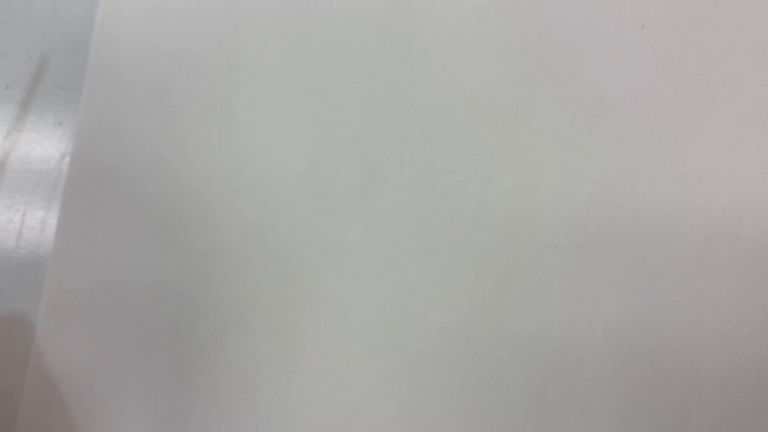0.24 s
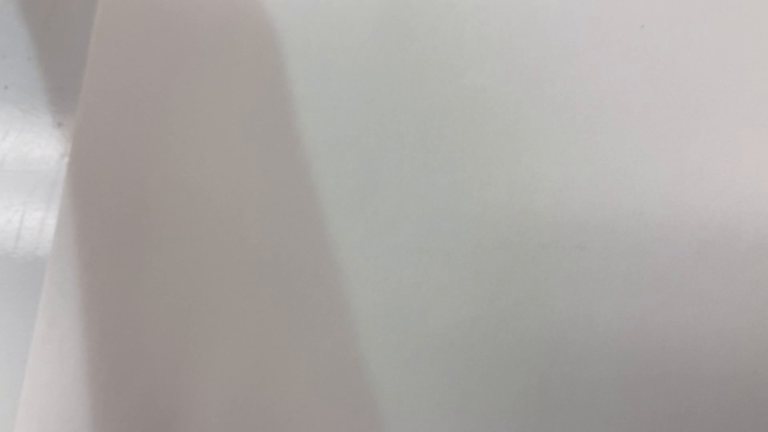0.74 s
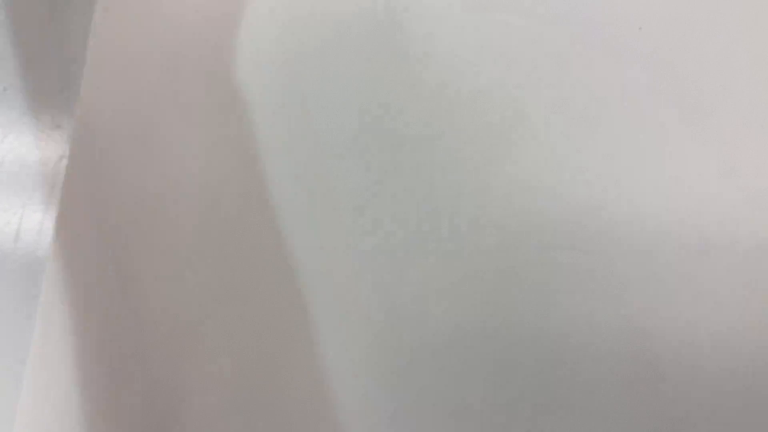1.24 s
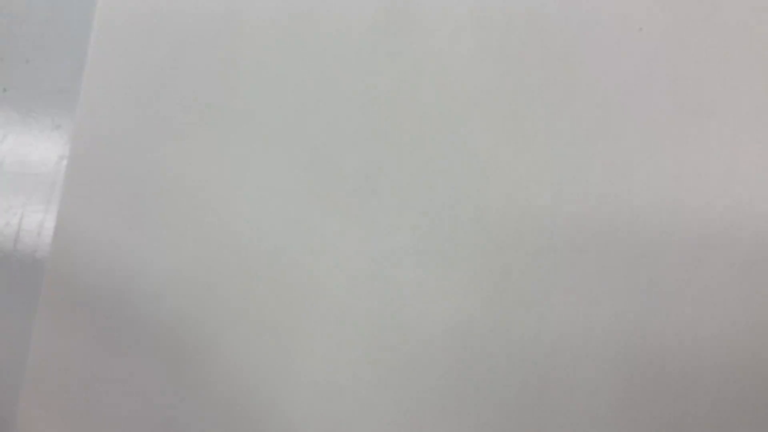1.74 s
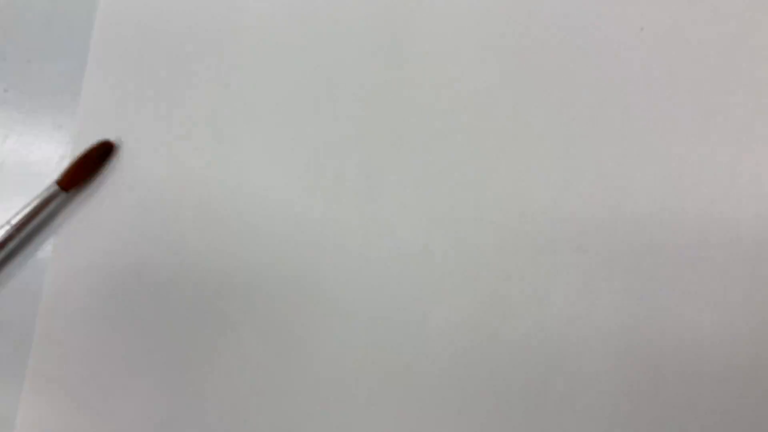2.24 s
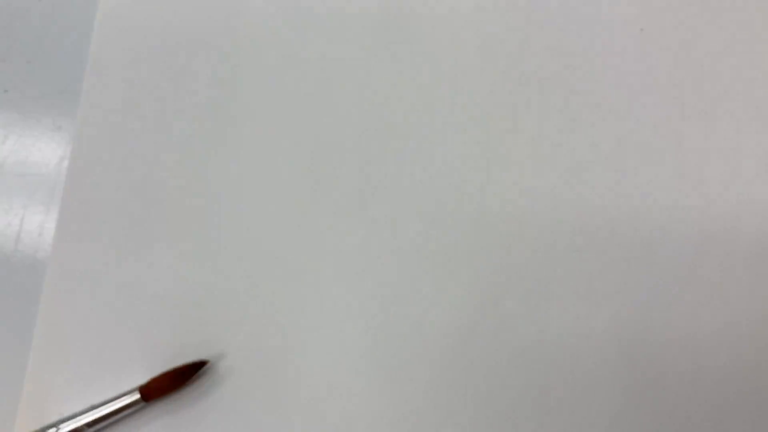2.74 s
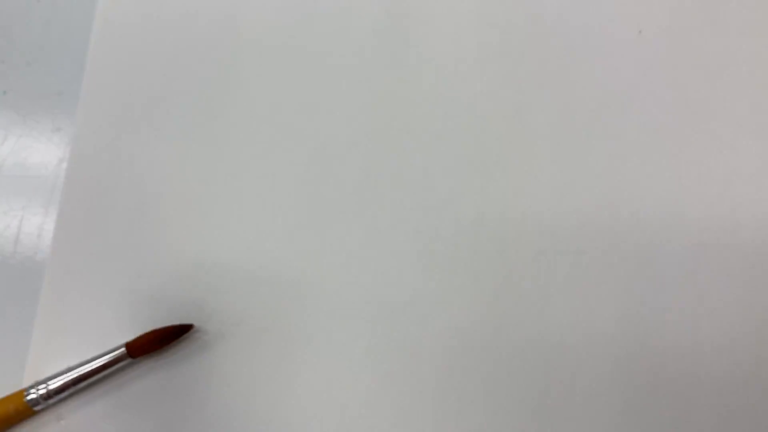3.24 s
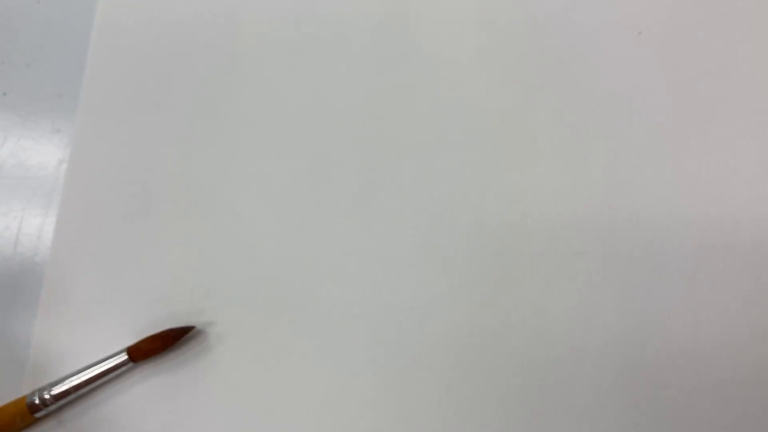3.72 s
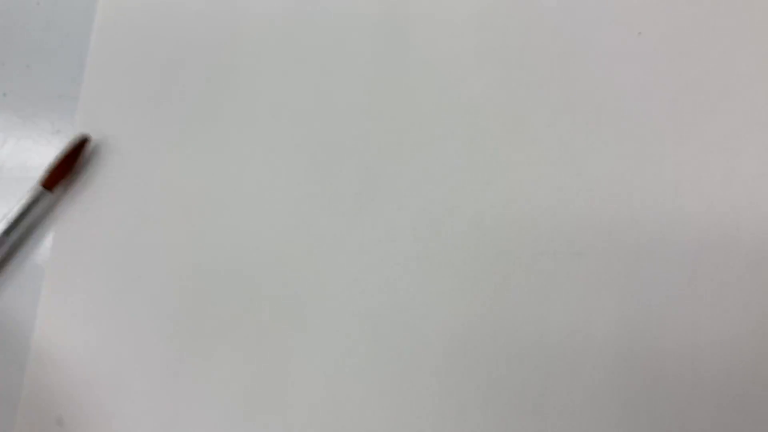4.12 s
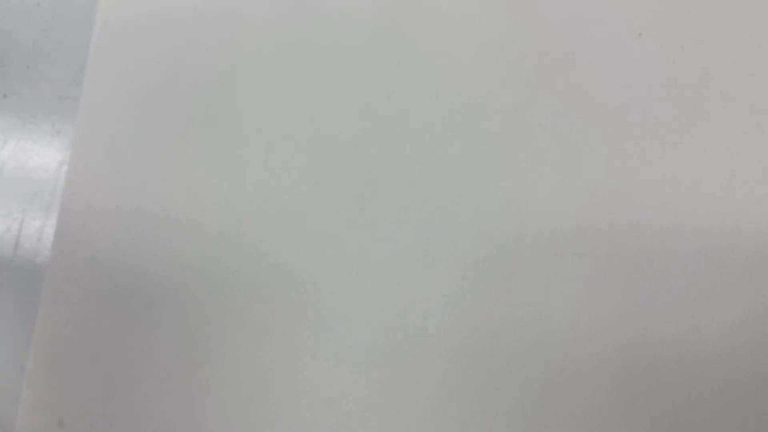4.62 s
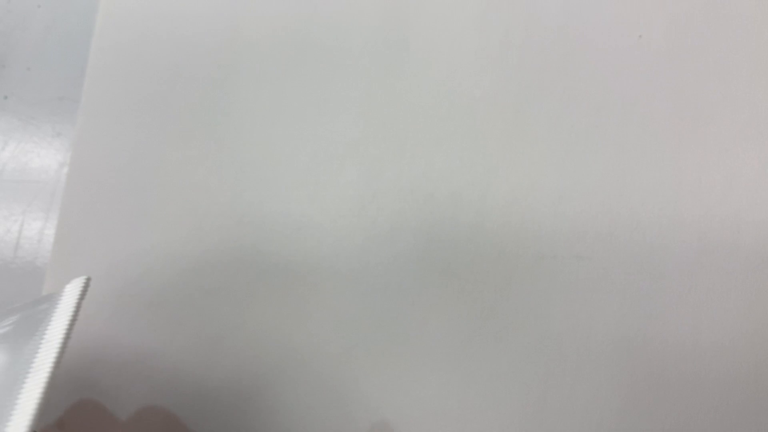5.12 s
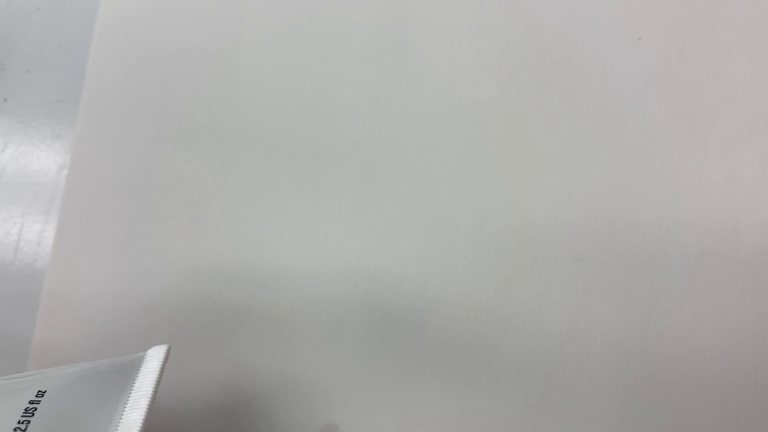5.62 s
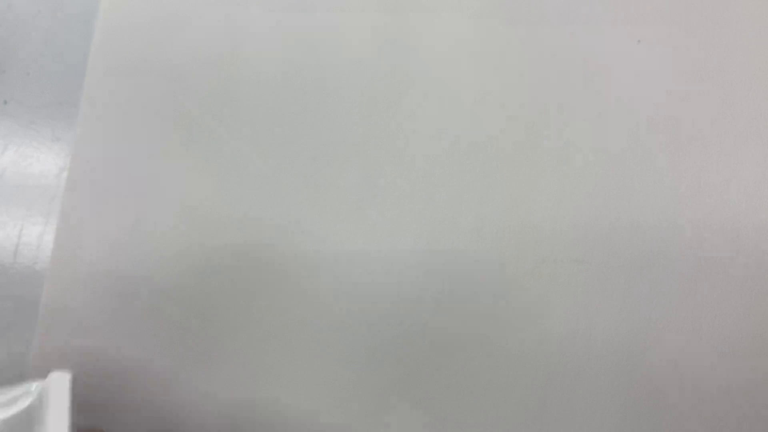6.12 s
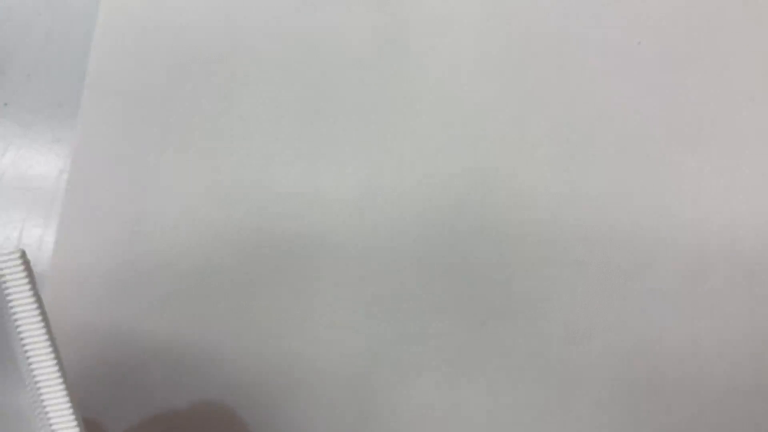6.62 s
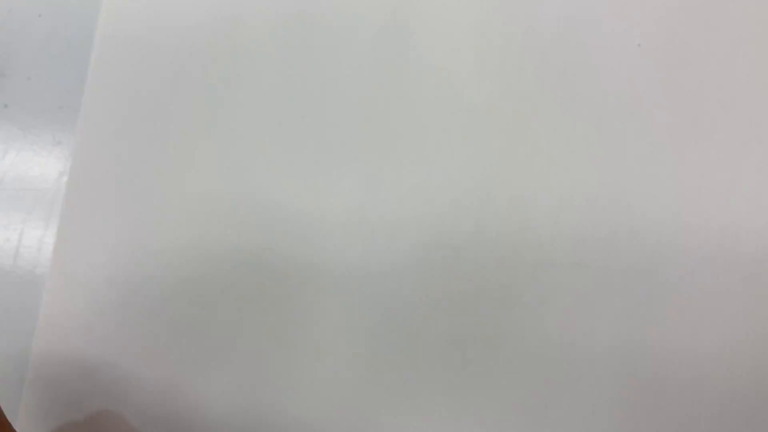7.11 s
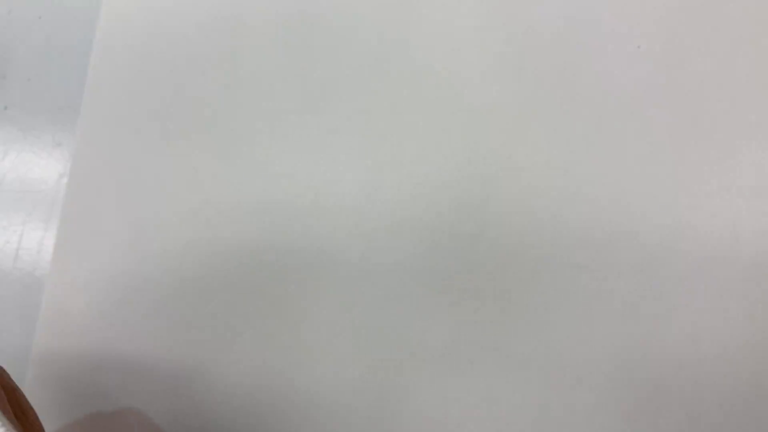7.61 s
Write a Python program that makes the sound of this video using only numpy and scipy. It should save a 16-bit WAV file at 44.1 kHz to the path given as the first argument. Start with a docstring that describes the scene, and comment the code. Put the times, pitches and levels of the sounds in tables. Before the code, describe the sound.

Close by in a small quiet room, hands slide paper over a table with soft rustles, scrapes and ticks. Several low thumps make the tabletop ring, and a paintbrush lands with a crisp click, the sharpest sound. More paper scraping and a hollow plastic knock come next, then a few tiny crackles from a plastic tube. The handling dies away, leaving faint hum and hiss.

```python
"""Paper, paintbrush and plastic tube on a table.

A sheet of paper is smoothed and pushed about close by in a small quiet room; its fibres catch and slip,
and the table drones under it. Hands bump the table and set it ringing. A paintbrush is put down with a
sharp click, hollow plastic knocks, and a plastic tube is picked up and crinkles as its wall buckles.
A faint low hum and hiss lie under it all."""
import sys
import numpy as np
from scipy import signal
from scipy.fft import rfft, irfft, next_fast_len
from scipy.io import wavfile
from scipy.ndimage import uniform_filter1d, map_coordinates

SR = 44100
rng = np.random.default_rng(int(sys.argv[2]) if len(sys.argv) > 2 else 0)


def inscribe(sig):
    """Save sig as 16-bit PCM at rate SR to the path in sys.argv[1].

    A 1-D sig is mono; a 2-D sig holds one channel per row.
    Samples are clipped to [-1, 1] before scaling.
    """
    pcm = np.round(np.clip(np.atleast_2d(sig).T, -1, 1) * 32767)
    wavfile.write(sys.argv[1], SR, pcm.astype(np.int16))


N = 346626


def amp(db):
    """Decibels to gain."""
    return 10 ** (np.asarray(db) / 20)


def unit(x):
    """x at rms 1."""
    return x / np.sqrt(np.mean(x ** 2) + 1e-20)


def along(points, hz):
    """(freq_hz, value) points read on a log axis."""
    freqs, values = np.transpose(points)
    return np.interp(np.log(hz + 1), np.log(freqs), values)


def filtered(x, response):
    """x times a complex frequency response."""
    n = x.shape[-1]
    size = next_fast_len(n + 4096)
    return irfft(rfft(x, size) * response(np.fft.rfftfreq(size, 1 / SR)), size)[..., :n]


def coloured(x, spectrum):
    """x shaped by a spectrum, at rms 1."""
    return unit(filtered(x, lambda hz: amp(along(spectrum, hz))))


def resonant(x, peaks):
    """x through parallel resonances, at rms 1."""
    return unit(filtered(x, lambda f: sum(
        amp(db) * 1j * f * width / (hz * hz - f * f + 1j * f * width) for hz, width, db in peaks)))


def noise(size):
    """Two independent white noises."""
    return rng.standard_normal((2, size))


def wobble(rate_hz):
    """Smooth random curve, rate_hz knots a second."""
    knots = rng.standard_normal(int(N * rate_hz / SR) + 4)
    return map_coordinates(knots, [np.arange(N) * rate_hz / SR])


def add(track, start_s, sound):
    """Mix a sound in at start_s, which may be negative."""
    start = round(start_s * SR)
    sound = sound[:, max(-start, 0):]
    part = track[:, max(start, 0):][:, :sound.shape[1]]
    part += sound[:, :part.shape[1]]


def burst(spectrum, t60_s, attack_s):
    """A contact's dense ring: decaying coloured noise."""
    t = np.arange(SR // 3) / SR
    return coloured(noise(len(t)), spectrum) * amp(-60 * t / t60_s) * (1 - np.exp(-t / attack_s))


def ring(modes, attack_s, scatter_db):
    """Damped modes, their strengths scattered per blow."""
    t = np.arange(SR // 2) / SR
    phases = [[0], [np.pi / 2]]
    tones = 0
    for hz, db, t60_s in modes:
        struck_db = db - scatter_db * rng.standard_normal((2, 1))
        tones += amp(struck_db - 60 * t / t60_s) * np.sin(2 * np.pi * hz * t + phases)
    return tones * (1 - np.exp(-t / attack_s))


def friction(grain_db, rate_hz):
    """Fibres catch and slip: noise in tiny uneven clumps."""
    return noise(N) * amp(grain_db * wobble(rate_hz))


def stroke_gain(length_s, attack_s=0.018, swell_db=1.5, fade_db_per_s=399.5):
    """The hand gets going, is fastest midway, then stops."""
    t = np.arange(SR) / SR
    attack = np.sin(np.pi / 2 * np.minimum(t / attack_s, 1)) ** 2
    arch = np.sin(np.pi * np.minimum(t / length_s, 1)) - .5
    return attack * amp(swell_db * arch - fade_db_per_s * np.maximum(t - length_s, 0))


# rubbed table and sheet resonances: centre_hz, width_hz, level_db
DRONE_PEAKS = [(235, 25, 4.5), (290, 100, -4), (381, 40, -1.5), (624, 150, -14), (1180, 49, -16),
               (1650, 35, -14), (1955, 45, -17), (2130, 30, -19.5)]
SHEET_PEAKS = [(1159, 77, 1.5), (1590, 40, -9), (1900, 170, -9.5), (3010, 600, -10.5), (3450, 600, -13.5)]
# paper friction spectra: freq_hz, level_db
RUB_SPECTRUM = [(350, -22), (600, 3.5), (1000, -3.5), (2000, -1.5), (3500, -4.5), (5000, -11.5),
                (7000, -14.5), (10000, -35.5)]
HISS_SPECTRUM = [(3000, -34.5), (6000, -3.5), (8000, 0), (11500, -0.5), (13000, -6.5), (15000, -7),
                 (16000, -7.5)]
# resting hand's stir: time_s, rub_db
FIDGET_LEVELS = [(0, -93), (1.7, -77), (3.2, -84), (4.799, -90), (5.9, -90), (6.399, -95)]
# hand strokes: start_s, length_s, rub_db, drone_offset_db, hiss_offset_db
HAND_STROKES = [(-.02, 0.15, -58, 11.5, 0), (.23, 0.072, -70, 12.5, -6), (.335, 0.059, -60, -1, -4),
                (1.29, .12, -69.5, 3, -9), (1.39, .13, -60.5, 1, -12), (1.855, 0.21, -62.5, 3, -2.5),
                (1.974, 0.059, -53, 1.5, 8), (2.033, .53, -74.5, 26.5, -36),
                (2.235, 0.042, -58.5, 12.5, -9), (2.605, 0.037, -59, 7, 9.5), (2.63, 0.083, -67.5, 13, -7),
                (2.82, 0.019, -79.5, 11, 12), (3.067, 0.078, -85, 18.5, 10), (3.56, 0.17, -76, 23, -19.5),
                (3.78, 0.36, -65, 9, -3.5), (4.11, 0.35, -61, 10, 1), (4.47, 0.12, -65, 10, 3),
                (5.08, 0.076, -89, -12, 14), (5.33, 0.14, -80, 0, 3), (5.69, 0.19, -79, -5, -1.5),
                (5.906, 0.057, -80, 2, 3.5)]


def paper_sliding(fidget_swing_db=5.5, fidget_drone_db=13):
    """Hand and sheet rub over the droning table; between strokes the hand keeps stirring."""
    power = np.zeros((3, N))
    for start_s, length_s, db, drone_db, hiss_db in HAND_STROKES:
        gains = amp([db + drone_db, db, db + hiss_db])
        add(power, start_s, np.outer(gains, stroke_gain(length_s)) ** 2)
    drone_gain, rub_gain, hiss_gain = np.sqrt(power)
    fidget_db = np.interp(np.arange(N) / SR, *np.transpose(FIDGET_LEVELS))
    fidget = amp(fidget_db + fidget_swing_db * wobble(rate_hz=5.2))
    drone_gain = np.hypot(drone_gain, amp(fidget_drone_db) * fidget)
    rub_gain = np.hypot(rub_gain, fidget)

    drone = resonant(friction(grain_db=2, rate_hz=90), DRONE_PEAKS)
    drone = unit(filtered(drone, lambda hz: 1 / (1 + (hz / 900) ** 4) / (1 + (140 / (hz + 1)) ** 4)))
    sheet = resonant(coloured(friction(grain_db=3, rate_hz=250), RUB_SPECTRUM), SHEET_PEAKS)
    rub = coloured(friction(grain_db=4, rate_hz=250), RUB_SPECTRUM)
    hiss = coloured(friction(grain_db=5, rate_hz=1000), HISS_SPECTRUM)
    return amp(-3) * (drone_gain * drone + rub_gain * (sheet + rub)) + hiss_gain * hiss


# edge drags: start_s, length_s, centre_hz, width_hz, level_db
EDGE_DRAGS = [(0, 0.056, 1120, 200, -53.5), (0.548, .089, 2500, 250, -76.5), (1.305, 0.23, 3770, 350, -66),
              (1.895, 0.05, 3530, 700, -56.5), (1.977, 0.085, 1140, 100, -54.5),
              (2.153, 0.041, 2700, 804, -52), (2.158, 0.21, 1570, 600, -57.5), (2.366, .22, 1160, 106, -60),
              (2.374, 0.19, 1740, 376, -62.5), (4.203, 0.095, 1610, 260, -48.5),
              (4.229, 0.029, 3200, 800, -49), (4.475, 0.04, 4330, 698, -48.5),
              (4.477, 0.055, 1235, 400, -55.5), (5.005, 0.43, 3260, 596, -83),
              (7.226, 0.045, 2070, 999, -76)]


def paper_scrapes():
    """An edge drags; one band of the sheet swells roughly and fades."""
    out = np.zeros((2, N))
    slips = friction(grain_db=2, rate_hz=300)
    for start_s, length_s, centre_hz, width_hz, db in EDGE_DRAGS:
        grit = slips[:, round(start_s * SR):][:, :round(length_s * SR)]
        band = unit(filtered(grit, lambda hz: (1 + (2 * (hz - centre_hz) / width_hz) ** 2) ** -.75))
        swell = np.sqrt(np.abs(np.hanning(band.shape[1])))
        add(out, start_s, amp(db + 2) * band * swell)
    return out


def sheet_ridges(x, ridge_db, above_hz=600):
    """The sheet's close modes cut fine, shifting ridges into a rub's spectrum."""
    hz, _, bins = signal.stft(x, SR, nperseg=512)
    ridges = uniform_filter1d(rng.standard_normal(bins.shape), size=2, axis=1)
    ridges = uniform_filter1d(ridges, size=36, axis=2)
    gain = np.where(hz[:, None] > above_hz, unit(amp(ridge_db * unit(ridges))), 1)
    return signal.istft(bins * gain, SR, nperseg=512)[1][:, :N]


# table top modes: pitch_hz, level_db, t60_s
TABLE_MODES = [(129.05, -8.5, 0.24), (203, -9, 0.12), (221.7, -5, 0.27), (270.7, 1.5, 0.2), (335, -5, .1),
               (442, -8.5, 0.081), (636, -15, .2), (781, -13.5, 0.13), (1165, -21, .11)]
# dull slap: freq_hz, level_db
SLAP_SPECTRUM = [(60, -21.5), (200, 8.5), (450, -1.5), (800, -2.5), (1300, -15), (2000, -25), (5000, -46)]
# hand bumps: start_s, level_db, slap_offset_db
HAND_BUMPS = [(0.067, -37.5, -12), (0.151, -42, -16), (1.119, -52.5, -1), (1.277, -47.5, -7.5),
              (1.818, -31.5, -12.5), (2.169, -52, 7.5), (3.486, -22.5, -7.5), (3.717, -26, -13),
              (3.789, -25, -13), (4.12, -27, -19.5), (4.305, -31, -4.5), (5.693, -43.5, -9.5)]


def table_bumps(thud_db=-35, thud_db_per_db=0.57):
    """Soft blows ring the top and shake the whole table with a low thud."""
    out = np.zeros((2, N))
    thud_modes = [(51, 4, 0.97), (78, -7, 0.42)]
    for start_s, db, slap_db in HAND_BUMPS:
        add(out, start_s, amp(db - 5) * ring(TABLE_MODES, attack_s=0.0039, scatter_db=1.5))
        add(out, start_s, amp(db + slap_db + 5) * burst(SLAP_SPECTRUM, t60_s=0.083, attack_s=0.0017))
        thud = ring(thud_modes, attack_s=0.0029, scatter_db=0)
        add(out, start_s, amp(thud_db + thud_db_per_db * db) * thud)
    return out


# hard contact spectra, shared with taps and crinkles: freq_hz, level_db
CLACK_SPECTRUM = [(150, -23.5), (400, -0.5), (750, -6), (1300, 1.5), (2200, -5.5), (3300, 1), (4300, -6),
                  (5500, -12.5), (7000, -13), (10000, -36.5)]
SNAP_SPECTRUM = [(2500, -30), (5500, -8), (8000, 2), (11500, 1), (13000, -8.5), (15000, -4.5),
                 (16000, -11.5)]
# brush modes: pitch_hz, level_db, t60_s
BRUSH_MODES = [(2295, -15, .13), (3780, -18, .17), (3800, -20.5, .13), (7320, -2.5, 0.036),
               (8200, -4, .028), (8730, -7.5, .02), (9740, 2, .02), (11540, 1, .025), (13400, -6.5, .02),
               (14940, -14, .02)]
# brush landing: start_s, level_db
BRUSH_HITS = [(3.7712, -6.5)]


def brush_click():
    """The hard handle grazes the table, cracks down and rings briefly."""
    out = np.zeros((2, N))
    for start_s, db in BRUSH_HITS:
        add(out, start_s - .011, amp(db - 41.5) * burst(SNAP_SPECTRUM, t60_s=.15, attack_s=.003))
        add(out, start_s, amp(db - 11) * ring(BRUSH_MODES, attack_s=.0003, scatter_db=3.5))
        add(out, start_s, amp(db - 7) * burst(SNAP_SPECTRUM, t60_s=.024, attack_s=.00031))
        add(out, start_s, amp(db - 23.5) * burst(CLACK_SPECTRUM, t60_s=.14, attack_s=.001))
    return out


# shell impact: freq_hz, level_db
SHELL_SPECTRUM = [(150, -13.5), (400, 4.5), (730, -12.5), (1150, 0.5), (1900, -6), (2700, -10), (3200, -10),
                  (4300, -5.5), (5000, -11.5), (5600, -9), (7300, -11.5), (8400, -10), (12000, -22),
                  (16000, -21.5)]
# shell resonances: centre_hz, width_hz, level_db
SHELL_PEAKS = [(1154, 130, -3.5), (1320, 41, -3), (1550, 50, -9), (3607, 180, 3.5), (4020, 120, 0),
               (4400, 170, 3), (5230, 150, -1.5), (8050, 120, -7)]
# shell landing: start_s, level_db
SHELL_HITS = [(4.3039, -18)]


def plastic_knock():
    """A plastic shell lands over a few milliseconds and rings hollowly."""
    out = np.zeros((2, N))
    for start_s, db in SHELL_HITS:
        landing = burst(SHELL_SPECTRUM, t60_s=0.072, attack_s=0.0047)
        add(out, start_s, amp(db) * (landing + amp(-30) * resonant(landing, SHELL_PEAKS)))
    return out


# paper and plastic taps: start_s, level_db, snap_offset_db, t60_s
TAPS = [(0.0947, -32.5, -4.5, 0.052), (.153, -57.5, 9, 0.057), (1.1186, -46.5, -9, 0.024),
        (1.2003, -62, -3.5, .03), (1.2786, -46.5, -19, 0.047), (1.8183, -52, -9, 0.18),
        (2.075, -46, -35, 0.1), (2.157, -42, -9.5, 0.038), (2.614, -65.5, 19, 0.087), (2.69, -51, -6, 0.12),
        (3.483, -48, -4.5, 0.25), (3.713, -56.5, -4.5, 0.28), (4.27, -43.5, 2.5, .051),
        (4.488, -44.5, -3, 0.11), (5.0805, -75.5, 16.5, 0.023), (5.692, -53.5, -7, 0.026),
        (5.7323, -55, -6.5, 0.036), (5.7681, -54, -10, 0.02), (6.1645, -56.5, -18, .032)]


def light_taps():
    """Light hard contacts: a dry clack and a bright snap."""
    out = np.zeros((2, N))
    for start_s, db, snap_db, t60_s in TAPS:
        clack = burst(CLACK_SPECTRUM, t60_s, attack_s=.0008)
        snap = amp(snap_db + 4) * burst(SNAP_SPECTRUM, t60_s, attack_s=.0007)
        add(out, start_s, amp(db) * (clack + snap))
    return out


# buckling tick: freq_hz, level_db
CRINKLE_SPECTRUM = [(1500, -26), (4000, -4.5), (5000, 11), (6500, 1), (8500, 3.5), (12000, 1.5),
                    (16000, -7)]
# tube wall buckles: start_s, level_db
BUCKLES = [(5.3328, -44), (5.3606, -40), (5.3832, -40.5), (5.4415, -51), (5.4755, -45), (5.5, -42.5),
           (5.5902, -56)]


def tube_crinkles():
    """The tube's wall buckles in tiny dry ticks, each with a duller clack."""
    out = np.zeros((2, N))
    for start_s, db in BUCKLES:
        add(out, start_s, amp(db - 8) * burst(CRINKLE_SPECTRUM, t60_s=0.028, attack_s=.0002))
        add(out, start_s, amp(db - 23) * burst(CLACK_SPECTRUM, t60_s=0.074, attack_s=.00028))
    return out


def with_reflections(x):
    """x plus weak early copies off the table and the things on it."""
    delays_s = rng.uniform(.002, .018, (2, 6))
    gains = amp(-15.5) * rng.choice([-1, 1], (2, 6))
    copies = np.zeros((2, N))
    for channel in range(2):
        for delay_s, gain in zip(delays_s[channel], gains[channel]):
            copies[channel] += gain * np.pad(x[channel], (int(delay_s * SR), 0))[:N]
    return x + filtered(copies, lambda hz: hz ** 2 / (hz ** 2 + 700 ** 2))  # small things reflect no bass


# room decay: freq_hz, t60_s
ROOM_DECAY = [(150, 0.74), (1000, 0.2539), (5000, 0.5), (15000, 0.19)]
# echo colour: freq_hz, level_db
ECHO_SPECTRUM = [(150, -11), (1000, -4), (4500, -12.5), (8000, -12.5), (15000, -15)]


def room_echo(x):
    """Wall reflections, each frequency dying at its own rate."""
    hz, t, bins = signal.stft(noise(SR // 2), SR, nperseg=256)
    decay = amp(-60 * t / along(ROOM_DECAY, hz)[:, None])
    tail = signal.istft(bins * decay, SR, nperseg=256)[1]
    tail = filtered(tail / np.linalg.norm(tail[0]), lambda f: amp(along(ECHO_SPECTRUM, f)))
    tail = np.pad(tail, ((0, 0), (SR // 200, 0)))  # 5 ms pre-delay
    return signal.fftconvolve(x, tail, axes=1)[:, :N]


# hum bands: centre_hz, width_hz, level_db
HUM_BANDS = [(56.34, 6.7, 2.5), (229, 8.3, -11), (1210, 51, -27.5)]
# room air: freq_hz, level_db
AIR_SPECTRUM = [(18, -26), (35, -8.5), (62, 5), (100, -5.5), (165, -14), (240, -7), (360, -18.5),
                (500, -30), (750, -37.5), (1200, -31), (1700, -39), (4000, -44.5), (11000, -44),
                (16000, -49.5)]


def background(air_db=-60.5, hum_db=-64, waver_db=3.7):
    """A low wavering hum over the room's air."""
    hum = resonant(noise(N), HUM_BANDS)
    hum = unit(filtered(hum, lambda hz: 1 / (1 + (hz / 1800) ** 4)))
    air = coloured(noise(N), AIR_SPECTRUM)
    return amp(air_db) * air + amp(hum_db + waver_db * wobble(rate_hz=6)) * hum


def scene():
    """Everything on the table, in its room; the brush lands close by and sounds drier."""
    paper = sheet_ridges(paper_sliding() + paper_scrapes(), ridge_db=3)
    table = paper + table_bumps() + light_taps() + tube_crinkles() + plastic_knock()
    click = brush_click()
    return with_reflections(table) + click + room_echo(table + amp(-4.5) * click) + background()


# left-right likeness: freq_hz, correlation
STEREO_LIKENESS = [(40, .9), (260, .92), (450, .65), (700, .05), (4500, .15), (6500, .6), (8000, .92),
                   (10000, .96), (15000, .96)]


def record(dry, lag_s=.000305, top_hz=15900):
    """Two microphone ports share bass and treble; the right one's treble comes late and inverted."""
    def mid_side_gains(hz):
        angle = np.arccos(along(STEREO_LIKENESS, hz)) / 2
        return np.array([np.cos(angle), np.sin(angle)])

    def late_inverted(hz):
        treble_share = np.clip((hz - 450) / 500, 0, 1)
        return np.exp(-1j * (2 * np.pi * hz * lag_s + np.pi) * treble_share)

    mid, side = filtered(dry, mid_side_gains)
    pair = np.array([mid + side, filtered(mid - side, late_inverted)])
    # freq_hz, left_minus_right_db
    balance = [(60, 2.5), (250, 0.5), (600, -1.5), (2000, -2.0), (6000, -0.5)]
    pair = filtered(pair, lambda hz: amp(np.outer([.5, -.5], along(balance, hz))))
    return filtered(pair, lambda hz: 1 / (1 + (hz / top_hz) ** 120))


dry = scene()
out = record(dry)
inscribe(out)
```